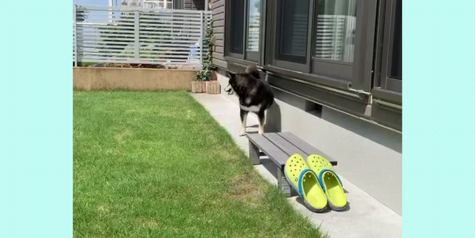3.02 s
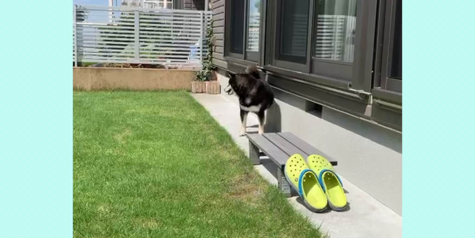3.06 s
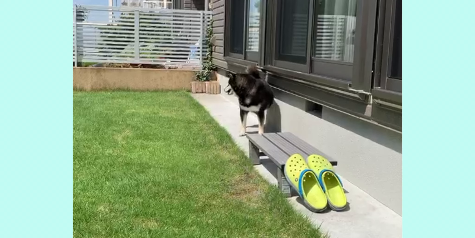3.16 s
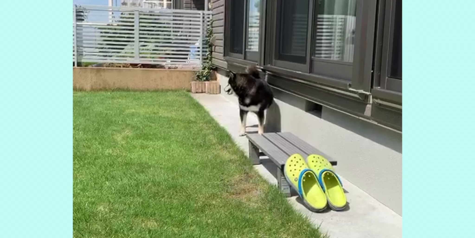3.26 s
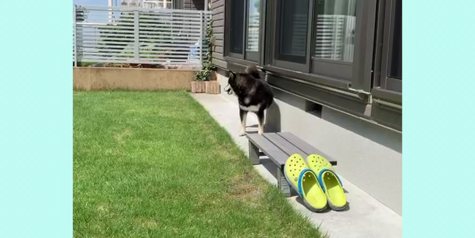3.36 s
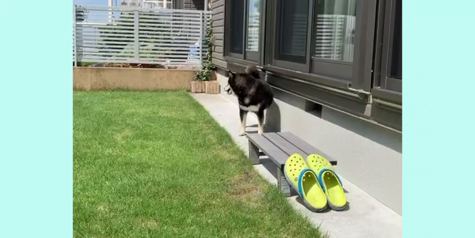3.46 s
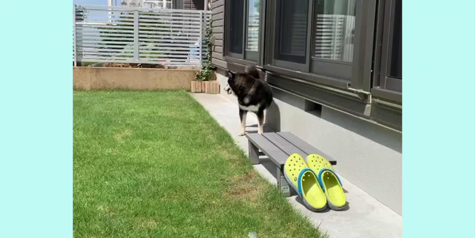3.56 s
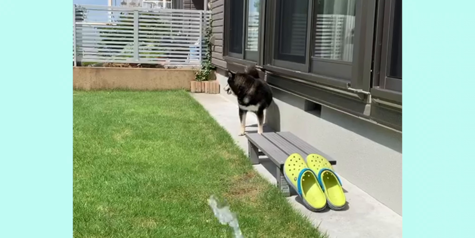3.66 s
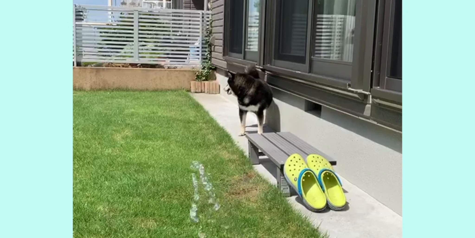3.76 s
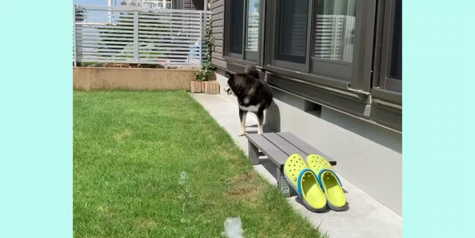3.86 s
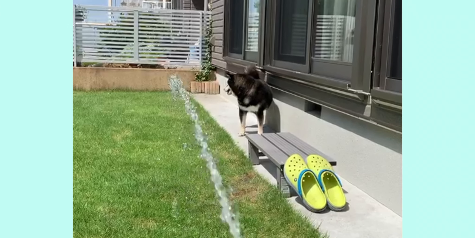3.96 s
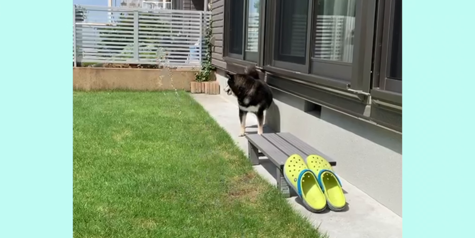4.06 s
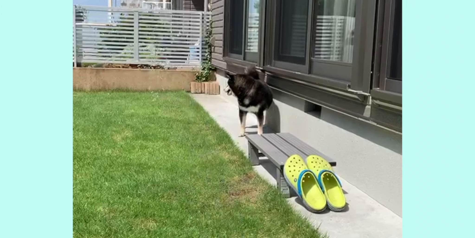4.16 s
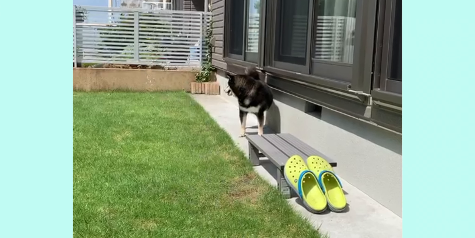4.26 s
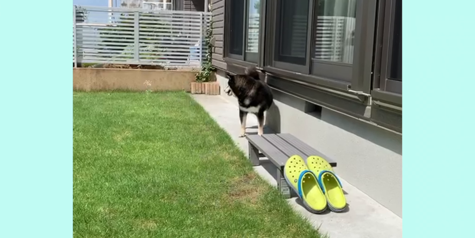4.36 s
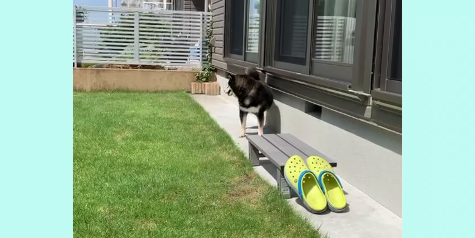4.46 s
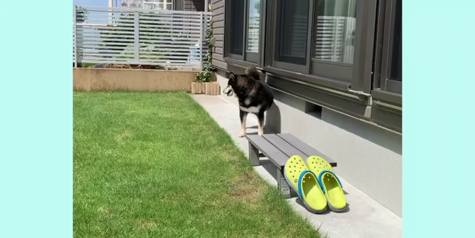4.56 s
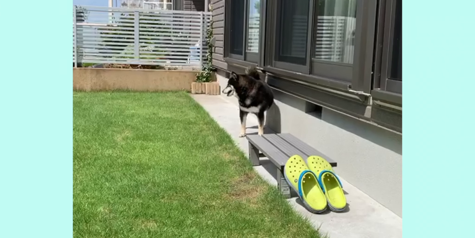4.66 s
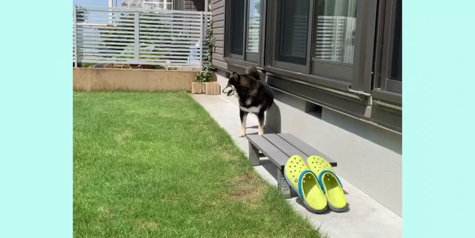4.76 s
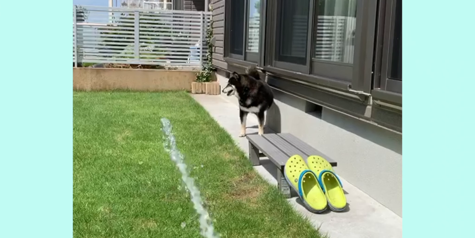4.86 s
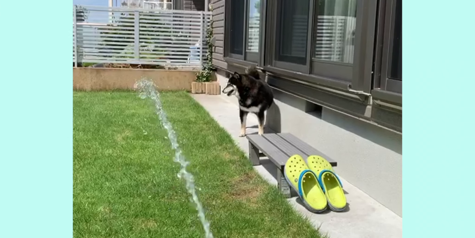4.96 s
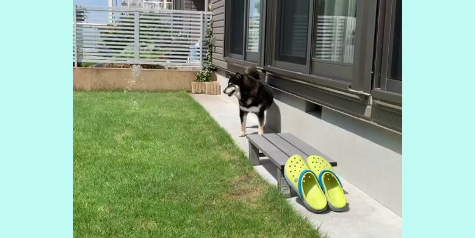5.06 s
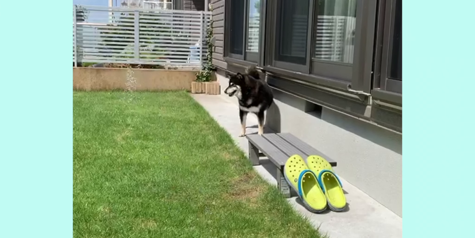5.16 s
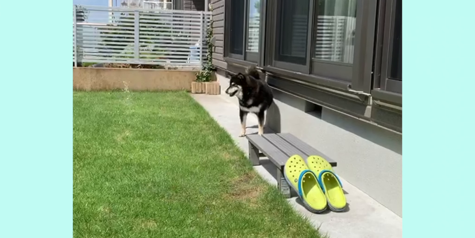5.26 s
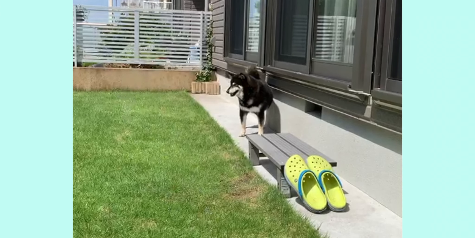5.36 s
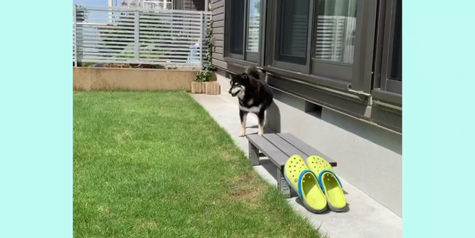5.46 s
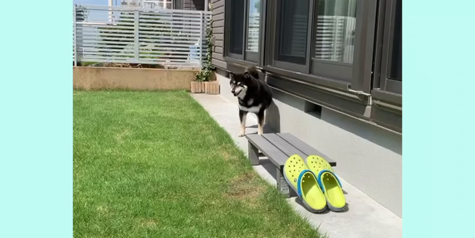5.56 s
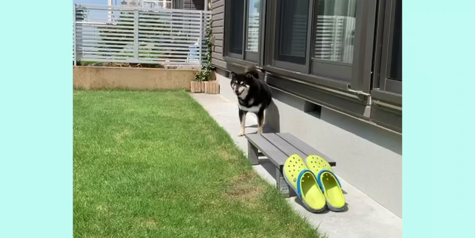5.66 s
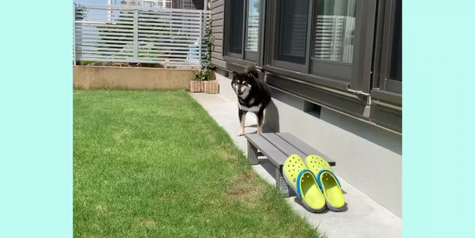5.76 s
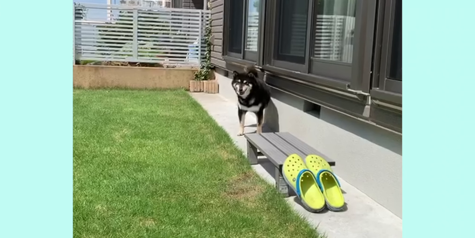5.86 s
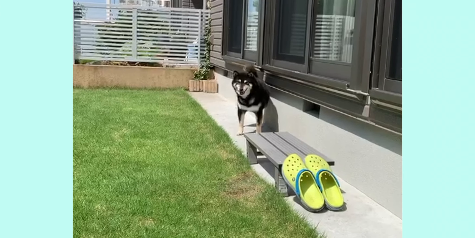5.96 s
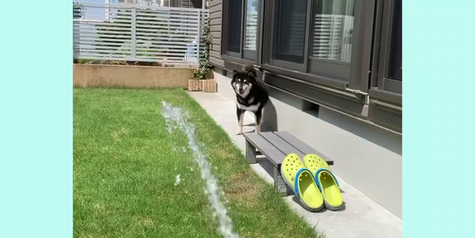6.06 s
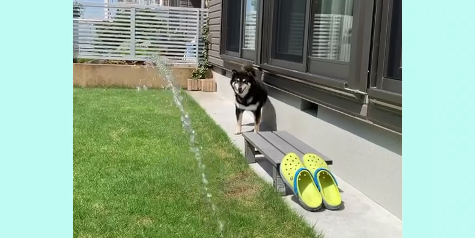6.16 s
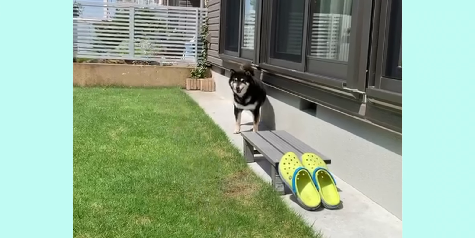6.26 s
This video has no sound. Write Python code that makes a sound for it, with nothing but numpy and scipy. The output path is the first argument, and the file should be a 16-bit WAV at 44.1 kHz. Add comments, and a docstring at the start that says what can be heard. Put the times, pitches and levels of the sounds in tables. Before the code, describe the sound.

Outdoors in a quiet garden, faint steady insect shimmer and low distant rumble. Every second or so a trigger nozzle very near the microphone clicks, spits a bright jet of water for about a sixth of a second, and clacks shut loudly. Light knocks of plastic follow, and fine droplets patter on the lawn. One squeeze is weak and only sputters; the last begins just before the end.

```python
"""A trigger nozzle on a garden hose is squeezed in short spurts: gated jet noise with a sagging whistle.
Spurts spit and hiss; most end in a clack of the valve, built from dying body modes and a noise crack.
Lever ticks and light knocks ring fewer or softer modes; water lands as sputtering fizz and a dull wash.
A far insect chorus (shaped hiss with faint tones) and a low town rumble lie behind, over a faint noise floor."""
import sys
import numpy as np
from scipy import signal
from scipy.fft import rfft, irfft, next_fast_len
from scipy.io import wavfile
from scipy.ndimage import uniform_filter1d

SR = 44100
rng = np.random.default_rng(int(sys.argv[2]) if len(sys.argv) > 2 else 0)


def wav_out(sig):
    """Save sig, one row per channel (or a flat mono array), as 16-bit PCM at SR to the path in sys.argv[1]."""
    wavfile.write(sys.argv[1], SR, np.round(np.clip(np.atleast_2d(sig).T, -1, 1) * 32767).astype(np.int16))


N = 278271


def gain_of(db):
    """Amplitude ratio of a level in dB."""
    return 10 ** (np.asarray(db) / 20)


def evened(x):
    """Scales to an RMS of 1 over all rows."""
    return x / np.sqrt(np.mean(x ** 2) + 1e-20)


def read(points, hz):
    """Interpolates a curve over log frequency."""
    f, value = np.transpose(points)
    return np.interp(np.log(hz + 1), np.log(f + 1), value)


def follow(curve):
    """Interpolates a curve over time."""
    s, value = np.transpose(curve)
    return np.interp(np.arange(N) / SR, s, value)


def add(mix, s, sound):
    """Adds a sound into the mix at s seconds, cut at the end."""
    part = mix[..., max(round(s * SR), 0):][..., :sound.shape[-1]]
    part += sound[..., :part.shape[-1]]


TONE_WIDTH_HZ = 16.


def noise(spectrum, patchy_db, size=512, tones=(), count=5):
    """Two unrelated noises of one colour, with shared drifting patches and optional narrow peaks."""
    frames, hz = 2 * N // size + 3, np.fft.rfftfreq(size, 1 / SR)
    a, b, c, d, patches = rng.standard_normal((frames, len(hz), 5)).T
    patches = uniform_filter1d(patches, size=count, axis=0)
    patches = evened(uniform_filter1d(patches, size=count + 1, axis=1))
    outside = (hz < spectrum[0][0]) | (hz > 1.1 * spectrum[-1][0])
    ends_db = np.where(outside, -50, 0)
    peaks_db = sum(db * np.exp(-((hz - f) / TONE_WIDTH_HZ) ** 2) for f, db in tones)
    colour_db = (read(spectrum, hz) + ends_db + peaks_db)[:, None]
    z = np.array([a + 1j * b, c + 1j * d]) * gain_of(colour_db + patchy_db * patches)
    x = signal.istft(z, window="cosine", nperseg=size, noverlap=size // 2)[1]
    return evened(x[:, :N])


def sputter(per_s, spread_db, ms):
    """A flickering gain: sparse droplets of uneven size over a steady stream."""
    size_db = spread_db * np.minimum(rng.exponential(1, N), 4)
    drops = gain_of(size_db) * (rng.random(N) < per_s / SR)
    return evened(1 + signal.lfilter([1], [1, -np.exp(-1000 / (ms * SR))], drops))


def resonate(x, hz, width_hz):
    """Resonance: shifts hz down to zero, smooths, and shifts back."""
    turn = np.exp(2j * np.pi * np.cumsum(hz * np.ones(x.shape[-1])) / SR)
    r = np.exp(-np.pi * width_hz / SR)
    return 2 * (turn * signal.lfilter([1 - r], [1, -r], x / turn)).real


def ring(modes, t, spread_turns, rise_s):
    """Dying modes, phases spread per row, scaled to peak 1; the blow takes a moment to build."""
    hz, db, t60 = np.transpose(modes)[:, None, :, None]
    wave = np.sin(2 * np.pi * (hz * t + spread_turns[..., None]))
    x = (gain_of(db - 60 * t / t60) * wave).sum(1)
    x = x * (1 - np.exp(-t / rise_s)) ** 2
    return x / abs(x).max()


# noise floor spectrum: f/Hz, relative density/dB
FLOOR_SPECTRUM = [(100, 2.5), (400, 3), (1500, -6), (3000, 0)]
FLOOR_DB, FLOOR_PATCHES_DB = -66.5, 3.5


def floor():
    """Faint low noise floor, unrelated left and right."""
    return gain_of(FLOOR_DB) * noise(FLOOR_SPECTRUM, FLOOR_PATCHES_DB, size=1024, count=8)


# town noise spectrum: f/Hz, relative density/dB
RUMBLE_SPECTRUM = [(12, -48), (20, -6), (69, 6), (210, -5.5), (240, -9.5), (370, -12.5), (539, -25.5),
                   (593, -60), (832, -20.5), (1360, -30.5), (1800, -24), (2340, -29), (3960, -120)]
RUMBLE_DB, RUMBLE_SWELL_DB = -57, -0.5


def rumble():
    """Low town noise whose level swells slowly at random, by sines of 0.5 to 5 Hz."""
    t = np.arange(N) / SR
    waves = [np.sin(2 * np.pi * (f * t + rng.random())) / np.sqrt(f) for f in np.geomspace(.5, 5, 12)]
    level_db = RUMBLE_DB + RUMBLE_SWELL_DB * evened(sum(waves))
    return gain_of(level_db) * noise(RUMBLE_SPECTRUM, 1.0, size=4096)


# insect hiss spectrum: f/Hz, relative density/dB
CHORUS_SPECTRUM = [(1500, -27), (2000, -13.5), (2600, 0), (3400, 6), (4300, 6.5), (5500, 4), (6600, 2.5),
                   (7400, -0.5), (8000, 1), (9800, -3), (10400, -12), (11000, -25.5), (11700, -29),
                   (12600, -16), (13600, -26), (14000, -68), (15500, -99)]
# chorus level: t/s, level/dB
CHORUS_LEVEL = [(0.0, -43), (3.2, -43.5), (6.31, -45.5)]
# narrow tones: f/Hz, level over the hiss/dB
CHORUS_TONES = [(2005, 4.), (2568, 3.), (2616, 4.), (2735, 4.), (3182, 4.), (3333, 6.5), (3530, 3.),
                (3779, 7.), (4140, 3.), (5067, 5.), (5565, 4.), (5835, 3.), (6071, 6.), (6404, 6.),
                (6565, 6.), (6655, 8.), (6750, 4.), (7020, 5.), (7164, 5.), (7260, 3.), (7430, 3.),
                (8417, 5.)]
FLUTTER_DB, CHORUS_PATCHES_DB = 1., 4.


def chorus():
    """Smooth far insect hiss with narrow tones standing out; its level flutters quickly."""
    flutter = uniform_filter1d(rng.standard_normal(N), size=500)
    flutter = evened(uniform_filter1d(flutter, size=500))
    hiss = noise(CHORUS_SPECTRUM, CHORUS_PATCHES_DB, size=2048, tones=CHORUS_TONES, count=1)
    return gain_of(follow(CHORUS_LEVEL) + FLUTTER_DB * flutter) * hiss


# dull wash after most shuts: t/s, level/dB
WASH_STARTS = [(.21, -53.5), (1.46, -60), (2.54, -59), (3.93, -62), (4.908, -58.5), (6.088, -53.5)]
# fizz of spray on grass: peak t/s, level/dB, half-length/s
SPLASH_SWELLS = [(0.23, -61, 0.027), (0.594, -53, 0.067), (1.478, -57, 0.024), (1.813, -62, 0.05),
                 (1.9, -63, .03), (2.005, -66, .015), (2.56, -74, 0.037), (2.957, -62, 0.18),
                 (3.964, -50, 0.04), (4.25, -65, 0.05), (4.42, -69, 0.049), (4.945, -54, 0.029),
                 (5.203, -62, 0.036), (5.39, -55.5, 0.03), (6.122, -56, 0.036)]
# fizz spectrum: f/Hz, relative density/dB
FIZZ_SPECTRUM = [(5000, 9), (9000, 12), (13000, 15.5), (15500, 10.5)]
# dull water spectrum, of the wash and of the nozzle's gurgle: f/Hz, relative density/dB
GURGLE_SPECTRUM = [(150, -1.5), (400, -0.5), (1000, 3), (1800, -1.5), (2600, -15.5)]
DRAIN_DB_PER_S, WASH_FLOOR_DB = 54.5, -88
FIZZ_PATCHES_DB, WASH_PATCHES_DB = 6., 4.5


def landing():
    """Drops bursting on grass: fine fizz that swells and fades, over a dull wash that drains away."""
    t = np.arange(N) / SR
    wash_gain = gain_of(WASH_FLOOR_DB)
    for s, db in WASH_STARTS:
        wash_gain = wash_gain + (t > s) * gain_of(db - DRAIN_DB_PER_S * abs(t - s))
    fizz_gain = sum(gain_of(db) * np.exp(-((t - s) / half_s) ** 2) for s, db, half_s in SPLASH_SWELLS)
    fizz = noise(FIZZ_SPECTRUM, FIZZ_PATCHES_DB, count=8) * sputter(150, 3., 1.1)
    wash = noise(GURGLE_SPECTRUM, WASH_PATCHES_DB) * sputter(70, 1.6, 3.)
    return fizz_gain * fizz + wash_gain * wash


# lever ticking in its guide: t/s, level/dB, tilt/dB per octave
LEVER_TICKS = [(.126, -35.5, -3), (0.292, -36.5, 6), (1.351, -33, 1), (1.502, -37, -5), (1.774, -39.5, 0),
               (1.786, -44, -11), (2.402, -31, -4), (2.569, -38, 1), (3.71, -33.5, -2), (3.724, -41.5, -2),
               (3.833, -38, -8), (3.975, -39, -8), (4.265, -40, 1), (4.759, -31.5, 4), (5.13, -47.5, -6),
               (5.981, -35.5, 8), (6.125, -34.5, 1)]
# lever modes: f/Hz, level/dB, t60/s
LEVER_MODES = [(653, -16.5, 0.021), (1157, 0, 0.017), (1752, 6, .013), (2490, -17, .018)]
TICK_RUSTLE_S, TICK_RUSTLE_SHARE = .012, .3


def ticks():
    """The same few modes of the lever, brighter or duller from tick to tick, with a small rustle."""
    out, t = np.zeros((2, N)), np.arange(1500) / SR
    for s, db, tilt_db in LEVER_TICKS:
        spread = rng.random((2, len(LEVER_MODES))) - .5
        grit = rng.standard_normal((2, len(t)))
        modes = [(hz, m_db + tilt_db * np.log2(hz / LEVER_MODES[1][0]), t60) for hz, m_db, t60 in LEVER_MODES]
        rustle = resonate(grit, 1450, 1100.) * np.exp(-t / TICK_RUSTLE_S) * (1 - np.exp(-t / 0.0017))
        tick = ring(modes, t, .3 * spread, .001) + TICK_RUSTLE_SHARE * rustle
        add(out, s, gain_of(db) * tick)
    return out


# dull knocks on the nozzle body: t/s, level/dB, centre f/Hz
BODY_KNOCKS = [(0.06, -38.5, 800), (0.187, -35.5, 900), (0.2, -29.5, 1630), (1.285, -40, 890),
               (1.316, -37.5, 890), (3.403, -51.5, 750), (3.629, -38.5, 676), (3.79, -41, 960),
               (3.911, -33, 950), (4.729, -41.5, 626), (5.206, -45, 990), (5.254, -50, 980),
               (5.264, -41.5, 1740), (5.28, -45.5, 1410), (5.934, -37.5, 1210), (6.107, -32, 1130),
               (6.236, -43, 1300)]
# plastic body modes, also rung by the clacks: f/Hz, level in a clack/dB, clack t60/s
NOZZLE_MODES = [(310, -11.5, 0.047), (444, -3.5, 0.03), (753, 3, 0.025), (978, 12.5, 0.015),
                (1149, 2.5, 0.02), (1421, 2.5, 0.019), (1595, -9.5, 0.026), (1808, -1, 0.015),
                (2040, -8, 0.023), (2460, -11, 0.026), (3100, 13, 0.011), (3960, 15, 0.018),
                (5200, -7, 0.0098)]
KNOCK_LOSS_DB_PER_OCTAVE, KNOCK_RING = 22, .9  # ring time re clack
RUSTLE_S, RUSTLE_SHARE = .012, .3


def knocks():
    """Light taps ring the body modes near their centre and leave a short rustle."""
    out, t = np.zeros((2, N)), np.arange(3000) / SR
    for s, db, centre_hz in BODY_KNOCKS:
        spread = rng.random((2, len(NOZZLE_MODES))) - .5
        grit = rng.standard_normal((2, len(t)))
        modes = [(hz, -KNOCK_LOSS_DB_PER_OCTAVE * abs(np.log2(hz / centre_hz)), KNOCK_RING * t60)
                 for hz, _, t60 in NOZZLE_MODES]
        rustle = resonate(grit, centre_hz, 1440.0) * np.exp(-t / RUSTLE_S) * (1 - np.exp(-t / 0.00185))
        knock = ring(modes, t, 0.8 * spread, 0.0016) + RUSTLE_SHARE * rustle
        add(out, s - .001, gain_of(db) * knock)
    return out


# valve snapping shut, the last shut led a few ms earlier by a knock rung the same way: t/s, level/dB, crack
# gain re body/dB, favoured f/Hz, loss away from it/dB per octave
VALVE_CLACKS = [(.2, -20, 8.5, 780, 25), (1.452, -14.5, 10, 1030, 7.5), (2.529, -14, 10.5, 880, 8),
                (3.924, -14.5, 5.5, 1200, 8.5), (4.905, -13, 7.5, 900, 11), (6.0858, -15.5, -2, 770, 7.5),
                (6.0893, -14.5, 15.5, 1080, 37)]
CRACK_EDGE, CRACK_SNAP, CRACK_FIZZ = .6, 1.1, .9  # shares of the bare crack and its two bands


def clacks():
    """A blow swells the modes of the plastic body; the seat cracks shut; wall and ground return a blur."""
    out, t = np.zeros((2, N)), np.arange(3000) / SR
    for s, db, crack_db, best_hz, loss_db in VALVE_CLACKS:
        spread = rng.random((2, len(NOZZLE_MODES))) - .5
        grit = rng.standard_normal((2, len(t)))
        modes = [(hz, m_db - loss_db * abs(np.log2(hz / best_hz)), t60) for hz, m_db, t60 in NOZZLE_MODES]
        body = ring(modes, t, spread * [[.06], [.25]], 0.0045)
        add(out, s - .0024, gain_of(db) * body)

        edge = (grit - resonate(grit, 275, 1800.0) / 2) * t / 0.003 * np.exp(-t / 0.00069)
        snap, fizz = resonate(edge, 3400, 2170), resonate(edge, 11000, 4000.)
        tail = 0.071 * grit * np.exp(-t / 0.0062)
        crack = CRACK_EDGE * edge + CRACK_SNAP * snap + CRACK_FIZZ * fizz + tail
        add(out, s - .0004, gain_of(db + crack_db) * crack)

        blur = resonate(resonate(grit, 970, 890), 970, 890)
        blur = blur * np.exp(-t / 0.021) * (1 - np.exp(-t / 0.013))
        add(out, s, gain_of(db - 10.5) * blur)
    return out


# squeezes, for valve() and the small spits: opens t/s, shuts t/s, opening burst/dB, steady flow/dB,
# closing surge/dB, gurgle/dB, whistle start f/Hz, whistle end f/Hz, whistle/dB (flow: before HISS_DB)
SQUEEZES = [(0.052, 0.202, -50.5, -57, -48, -53.5, 5930, 3900, -46.5),
            (1.315, 1.454, -47, -56, -43, -50.5, 5440, 4800, -41),
            (2.372, 2.53, -42, -60, -43, -52, 5650, 4650, -41),
            (3.44, 3.636, -61, -62.5, -66, -66, 3000, 3480, -52),
            (3.792, 3.925, -44.5, -58.5, -44.5, -51.5, 5200, 5150, -39),
            (4.728, 4.906, -45, -56, -46, -51.5, 5200, 5000, -41.5),
            (5.934, 6.085, -42.5, -56, -41.5, -49.5, 5350, 5260, -40.5),
            (6.239, 6.4, -46.5, -55, -47, -51, 5900, 5400, -42.5)]
# placed spits of air and water, loud and faint:
# peak t/s, level/dB, centre f/Hz, half-length/ms, bright edge re puff/dB
PLACED_SPITS = [(0.0493, -42, 3330, 1, -3), (0.057, -32, 3660, 0.98, -8), (.063, -41, 5000, 0.67, -1),
                (0.075, -28, 4000, 1, -12), (0.0794, -28.5, 6100, 2.2, -1), (0.127, -33, 4000, 1.4, -4),
                (.188, -49, 6800, 1.5, -3), (0.1928, -34, 6000, 0.82, 5), (1.287, -53, 7000, .9, 13),
                (1.3042, -37, 3220, 1.5, -8), (1.3092, -33, 6100, .8, 1), (1.3166, -27.5, 5800, 1.8, -7),
                (1.3175, -29, 3270, 1.5, -20), (1.324, -36, 5700, 2.5, -10), (1.345, -33, 4900, 1., -12),
                (1.351, -34, 4800, 1.5, -4), (1.386, -30, 4700, 1.1, -12), (1.413, -36, 4700, 1., -12),
                (1.432, -36, 4800, .7, -6), (2.3662, -35, 6460, .9, -12), (2.372, -30, 6130, 0.67, -14),
                (2.3742, -25, 5560, 1.5, -11), (2.379, -24, 5900, 1, -15), (2.492, -35, 4500, 1.5, -14),
                (2.513, -34, 4500, 1., -14), (2.523, -44, 7000, 1, 1), (3.4341, -32, 6170, .6, -11),
                (3.4425, -44, 7000, .8, 9), (3.459, -49, 3360, 1.7, -12), (3.5, -50, 7000, 0.9, 11),
                (3.52, -47, 3530, 2.6, -16), (3.5451, -32.5, 3490, 1.2, -13), (3.553, -34, 3450, 2.4, -14),
                (3.568, -47, 3300, 3.8, -14), (3.5945, -34.5, 3350, 0.86, -13), (3.575, -38, 3300, 2.5, -9),
                (3.601, -43, 3300, 3., -14), (3.622, -51, 7000, .8, 10), (3.63, -51.5, 7000, 1.5, 13),
                (3.783, -36, 7500, 1.4, -1), (3.794, -24, 5490, .8, 3), (3.7955, -34, 6500, 0.81, 10),
                (3.8015, -37, 6000, .7, -4), (3.8085, -35, 5500, 0.59, -8), (3.814, -39, 5300, .7, -8),
                (3.8625, -37, 6600, 0.8, -14), (3.869, -28.5, 5530, 0.87, -5), (3.911, -42, 6230, 1.3, 3),
                (4.724, -36, 6720, 1, 4), (4.7307, -34.5, 6300, 1.2, 12.5), (4.736, -35, 6000, 1.2, -4),
                (4.7868, -27.5, 5380, 0.81, 2), (4.7985, -33, 5300, .6, -6), (4.806, -34.5, 5200, 1.5, -6),
                (4.821, -32, 5000, 1., -10), (4.893, -40, 6500, 1.6, 6), (5.915, -43, 6000, 0.85, 1),
                (5.934, -26, 5240, .8, -4), (5.94, -26, 5900, 1.1, -5), (5.946, -29, 5430, 1, -16),
                (5.963, -31, 5270, 1.2, -14), (5.987, -33, 5300, 1.2, -14), (6.003, -34, 5300, 1.2, -17),
                (6.023, -31, 5300, 1.2, -14), (6.208, -57, 7000, 1.2, 15), (6.2372, -39, 6540, 1, 1),
                (6.2402, -29, 6370, 1.7, 1), (6.246, -27.5, 3600, 1.4, -14)]
SMALL_SPITS_PER_SPURT, SMALL_SPIT_DB, SMALL_SPREAD_DB = 8, 7, 4  # level re the squeeze's steady flow value
SMALL_EDGE_DB, SMALL_SPIT_MS, SPIT_WIDTH_HZ = -6, 0.66, 1020


def spits(whistle_hz):
    """Short puffs of noise ringing the orifice, with a thin bright edge; small ones fall at random."""
    out, t = np.zeros((2, N)), np.arange(-400, 400) / SR
    small = []
    for opens, shuts, _, flow_db, *_ in SQUEEZES:
        for when, size in rng.random((SMALL_SPITS_PER_SPURT, 2)):
            s = opens + (shuts - opens) * when
            db = flow_db + SMALL_SPIT_DB + SMALL_SPREAD_DB * (2 * size - 1)
            small.append((s, db, whistle_hz[min(round(s * SR), N - 1)], SMALL_SPIT_MS, SMALL_EDGE_DB))
    for s, db, centre_hz, half_ms, edge_db in list(PLACED_SPITS) + small:
        grit = rng.standard_normal((2, len(t)))
        body = resonate(resonate(grit, centre_hz, SPIT_WIDTH_HZ), centre_hz, SPIT_WIDTH_HZ)
        edge = evened(np.diff(grit, prepend=0))
        puff = evened(body) + gain_of(edge_db) * edge
        add(out, s + t[0], gain_of(db) * puff * np.exp(-(1000 * t / half_ms) ** 2))
    return out


RISE_DB_PER_S, GURGLE_RISE_DB_PER_S = 1300, 483  # the gurgle creeps in ahead of the burst
SETTLE_S, SURGE_S = 0.054, 0.032  # burst decay, surge growth
SAG_S, WHISTLE_FADE_S = 0.012, .015  # pitch sag; the whistle dies as the seat closes


def valve():
    """Squeezes crack the valve open, settle, surge at closing: gains of three parts and whistle pitch."""
    t = np.arange(N) / SR
    flow, gurgle, blow = np.zeros((3, N))
    whistle_hz = np.full(N, float(SQUEEZES[0][6]))
    for opens, shuts, burst_db, flow_db, surge_db, gurgle_db, start_hz, end_hz, whistle_db in SQUEEZES:
        early, since = np.minimum(t - opens, 0), np.maximum(t - opens, 0)
        on = t < shuts
        db = flow_db + (burst_db - flow_db) * np.exp(-since / SETTLE_S)
        db = db + (surge_db - flow_db) * np.exp(-np.maximum(shuts - t, 0) / SURGE_S)
        flow = flow + on * gain_of(db + RISE_DB_PER_S * early)
        gurgle = gurgle + on * gain_of(gurgle_db + GURGLE_RISE_DB_PER_S * early)
        fade = np.clip((shuts - t) / WHISTLE_FADE_S, 0, 1)
        blow = blow + fade * gain_of(whistle_db + RISE_DB_PER_S * early)
        sagging_hz = end_hz + (start_hz - end_hz) * np.exp(-since / SAG_S)
        whistle_hz = np.where(t > opens - .1, sagging_hz, whistle_hz)
    return uniform_filter1d(flow, size=150), uniform_filter1d(gurgle, size=150), blow, whistle_hz


# jet hiss spectrum: f/Hz, relative density/dB
JET_SPECTRUM = [(2000, -13.5), (3000, 1), (4300, 2), (6500, 2), (8500, 1.5), (11000, 2), (15500, 1)]
HISS_DB, HISS_PATCHES_DB = 11, 2.5  # hiss re flow
WHISTLE_WIDTH_HZ, GURGLE_PATCHES_DB = 780, 2.


def jet(flow, gurgle, blow, whistle_hz):
    """Sputtering turbulent hiss and broad orifice whistle, with a gurgle in the nozzle."""
    hiss = noise(JET_SPECTRUM, HISS_PATCHES_DB, size=256) * sputter(260, 2.2, 0.4)
    tone = resonate(rng.standard_normal((2, N)), whistle_hz, WHISTLE_WIDTH_HZ)
    tone = evened(resonate(tone, whistle_hz, WHISTLE_WIDTH_HZ))
    whistle = blow * tone * sputter(110, 1.3, 2.7)
    water = gurgle * noise(GURGLE_SPECTRUM, GURGLE_PATCHES_DB)
    return gain_of(HISS_DB) * flow * hiss + whistle + water


def scene():
    """Row one reaches both ports; row two is the part that differs between them."""
    flow, gurgle, blow, whistle_hz = valve()
    background = rumble() + chorus() + landing()
    handling = ticks() + knocks() + clacks()
    return background + handling + spits(whistle_hz) + jet(flow, gurgle, blow, whistle_hz)


# stereo phase: f/Hz, left lead over right/half turns (before the lingering step)
LEFT_LEAD = [(0, -.03), (60, -.06), (300, -.14), (700, -.24), (1200, -.33), (2000, 0.), (2600, .44),
             (4000, .6), (4650, 1.), (5300, 1.4), (6000, 1.58), (6850, 2.), (8950, 3.), (11000, 4.),
             (13170, 5.), (15400, 6.), (22050, 9.1)]
# likeness of the two ports: f/Hz, share/0-1
PORT_LIKENESS = [(500, 1), (2000, 0.9), (3000, 0), (4500, 0.3), (15000, 0.4)]
# right port gain: f/Hz, gain/dB
RIGHT_GAIN = [(100, .3), (350, 2.2), (700, 1.1), (1400, 1.5), (2800, .4), (4000, 0.)]
EDGE_HZ = 15600


def record(dry):
    """Complementary mid and side combs turn left against right; then noise floor and band limit."""
    size = next_fast_len(N + 4096)
    hz = np.fft.rfftfreq(size, 1 / SR)
    common, apart = rfft(dry, size)
    half = np.pi / 2 * np.interp(hz, *np.transpose(LEFT_LEAD))
    half = half - .98 * (half > 0) * np.sin(4 * half) / 4  # lingers where the sides agree or oppose
    alike = np.clip(read(PORT_LIKENESS, hz), 0, 1)
    mid = np.cos(half) * common
    side = 1j * np.sin(half) * (alike * common + np.sqrt(1 - alike ** 2) * apart)
    right = (mid - side) * gain_of(read(RIGHT_GAIN, hz))
    out = irfft(np.array([mid + side, right]), size)[:, :N] + floor()
    lowpass = signal.firwin(1023, EDGE_HZ, window=("kaiser", 9), fs=SR)
    return signal.oaconvolve(out, lowpass[None], "same")


dry = scene()
out = record(dry)
wav_out(out)
```